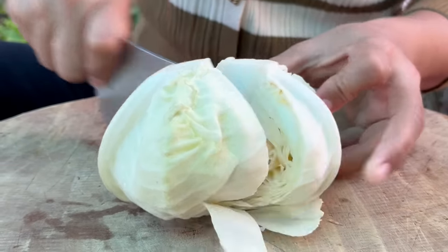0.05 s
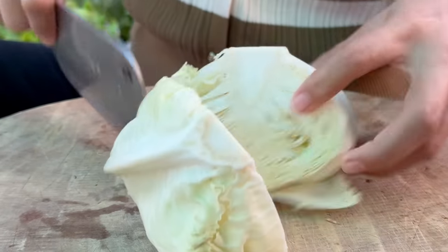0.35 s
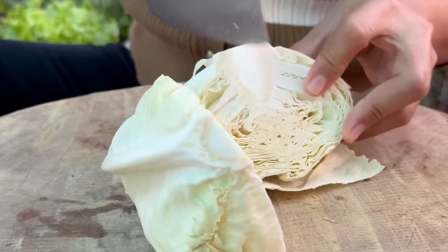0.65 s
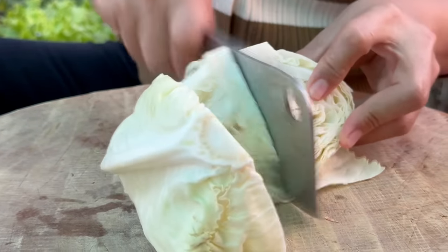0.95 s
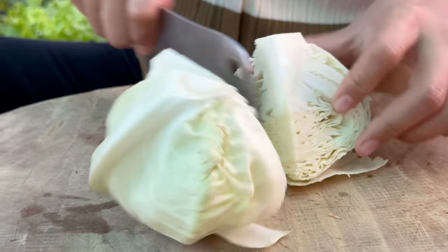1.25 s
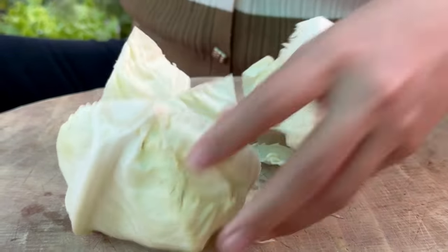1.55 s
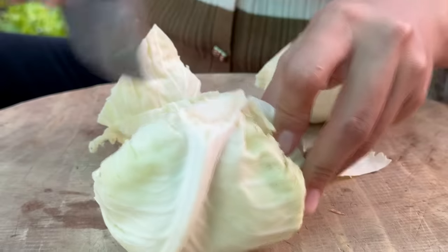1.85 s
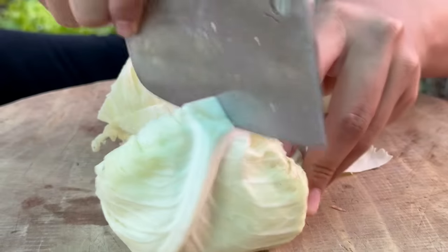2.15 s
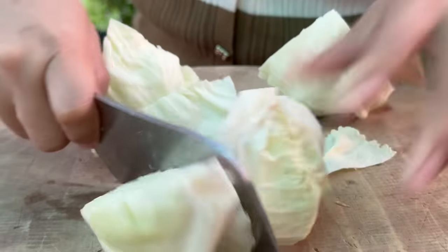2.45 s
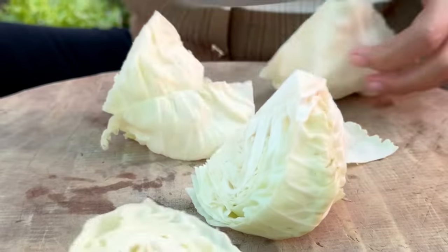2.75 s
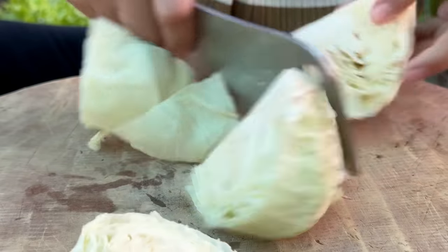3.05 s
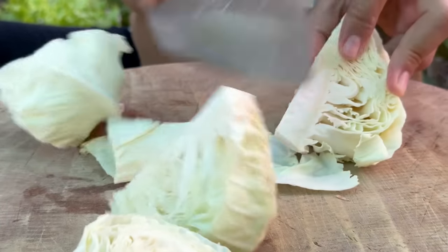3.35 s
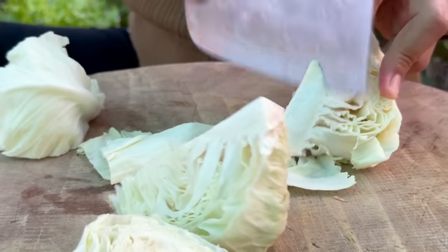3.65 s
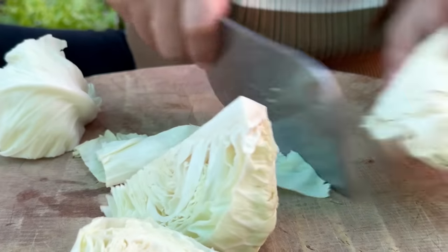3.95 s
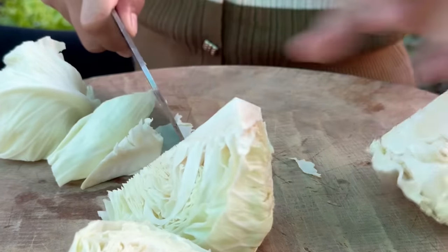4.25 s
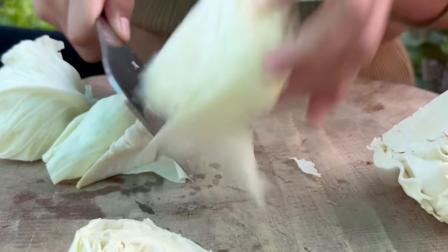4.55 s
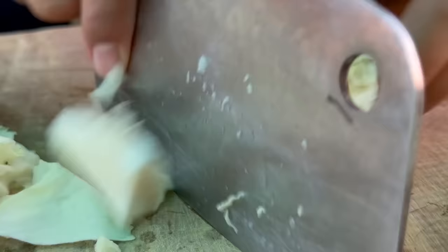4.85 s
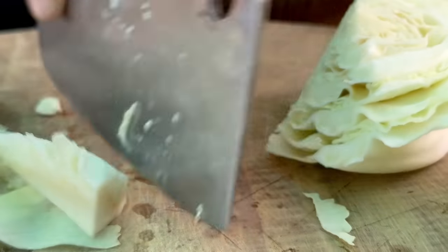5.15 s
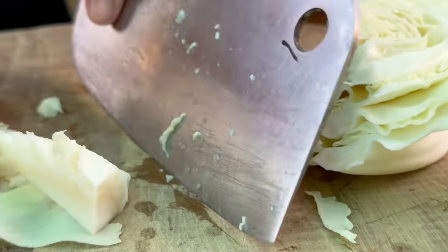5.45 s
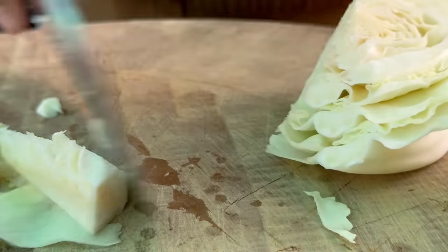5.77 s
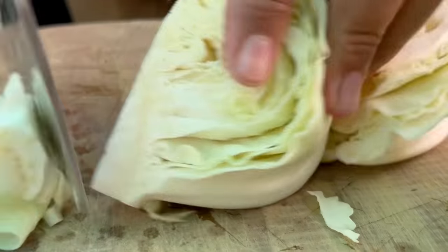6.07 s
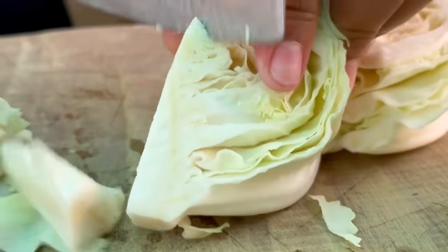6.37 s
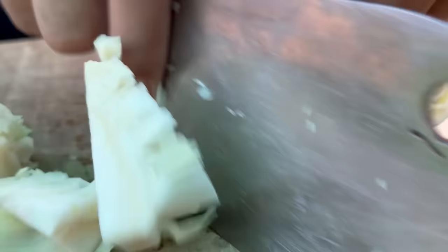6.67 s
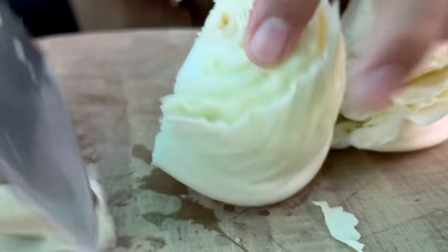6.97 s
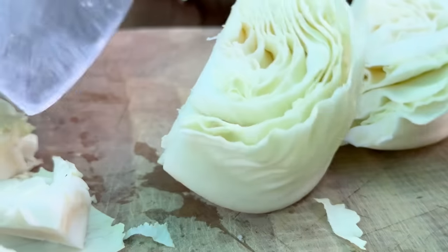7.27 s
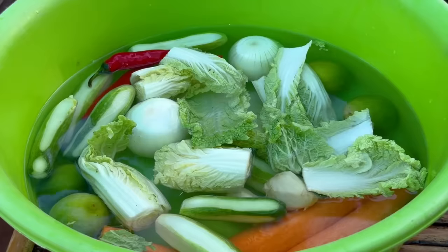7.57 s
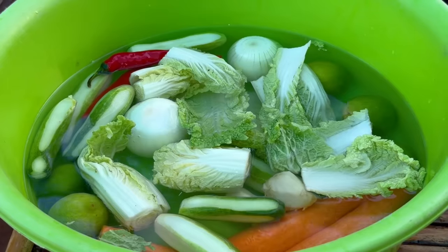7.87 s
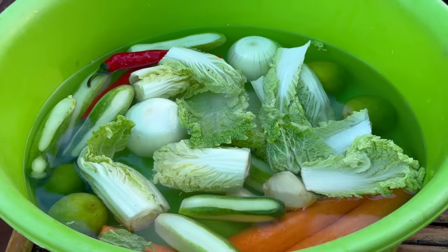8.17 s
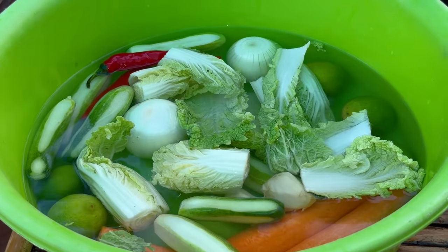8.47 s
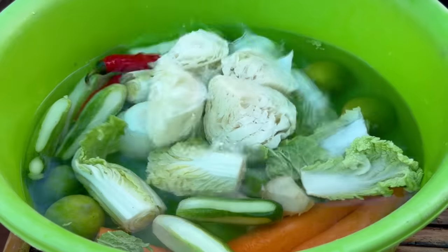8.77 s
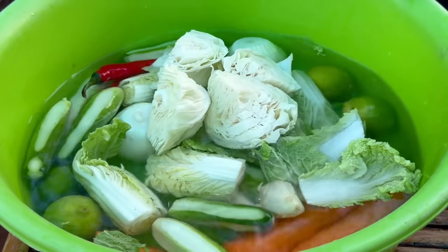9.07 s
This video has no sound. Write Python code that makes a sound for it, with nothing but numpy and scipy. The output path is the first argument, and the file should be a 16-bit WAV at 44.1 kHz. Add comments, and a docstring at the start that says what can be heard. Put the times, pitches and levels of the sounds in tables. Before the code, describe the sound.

A cleaver cuts cabbage on a thick wooden board, heard close up outdoors. After a hollow knock at 0.5 seconds, a crisp crunch swells and ends in a chop near 1 second. More crunching cuts thud into the wood at about 2.2, 3.8, 4.8 and 6.6 seconds. Between them, wedges and blade land with irregular hollow knocks, strongest around 2.6, 3.3, 4.1, 5.6 and 7.1 seconds, while ribs snap and wet leaves rustle. The steel pings briefly near 1.9 and 7.1 seconds, scrapes around 4, 5, 5.8 and 6.8, and sometimes whistles faintly. Fingers squeak softly on leaves around 5.5 and 6.2 seconds. From 7.5 seconds a low hum comes in, with a few small drips at a basin and pieces knocking down at 8.3, 8.7 and 9.1. Thin air and faint rumble continue throughout, with a distant engine fading after about 4 seconds.

```python
"""Crisp crunches and hollow wooden knocks, close up: a cleaver cuts a cabbage on a thick board outdoors.
Leaf cells burst under the edge, which then thuds into the wood. Wedges are turned and knocked down,
wet leaves rub and squeak, and the steel scrapes, pings and whistles. At the end a few pieces are set
down by a dripping basin with a low hum. A far engine, thin air and a faint rumble lie under it all."""
import sys
import numpy as np
from scipy import signal
from scipy.fft import rfft, irfft, next_fast_len
from scipy.io import wavfile
from scipy.ndimage import uniform_filter1d

SR = 44100
rng = np.random.default_rng(int(sys.argv[2]) if len(sys.argv) > 2 else 0)


def generate_wav(signal):
    """Clip the signal to [-1, 1] and save it as 16-bit WAV at the path in sys.argv[1]."""
    frames = np.transpose(np.atleast_2d(signal))
    scaled = np.clip(frames, -1, 1) * 32767
    pcm = np.round(scaled).astype(np.int16)
    wavfile.write(sys.argv[1], SR, pcm)


N = 406157
TIME = np.arange(N) / SR
HIT = TIME[:SR // 3]  # time axis of one short sound
BLOW = HIT[:SR // 6]  # shorter, for sounds that die quickly
TOP_HZ = 15900

# wedges and knife landing on the board and crushing leaves:
# t/s, level/dB, contact/s, place on the board/0-1, left minus right/dB, crunch/dB, crunch decay/s
KNOCKS = [(0.201, -36.5, 0.00012, 0.23, -2, -29.5, 0.0023), (0.321, -38.5, 0.0045, 0.88, -1, -72, 0.0023),
          (0.546, -16.5, 0.00072, 0.8, -1, -31.5, 0.0032), (1.246, -31, 0.0022, 0.76, -0.5, -27, 0.0017),
          (1.578, -29.5, 0.00024, 0.23, -2, -29, 0.003), (1.696, -43, 0.0023, 0.1, -6, -32, 0.00052),
          (1.9242, -22, 0.00016, 0.76, 1, -38.5, 0.0012), (1.94, -33.5, 0.001, 0.88, -4, -70, 0.0016),
          (2.296, -35.5, 0.0018, 0.13, 1, -66, 0.0039), (2.605, -19, 0.00068, 0.87, -4, -32, 0.004),
          (2.958, -24.5, 0.00048, 0.24, -1, -28.5, 0.0026), (3.039, -44.5, 0.0057, 0.92, -2, -69, 0.002),
          (3.325, -17.5, 0.00062, 0.85, -2.5, -33.5, 0.0038), (3.383, -30.5, 0.0028, 0.92, 1, -76, 0.002),
          (3.722, -25.5, 0.0018, 0.9, -0.5, -32.5, 0.0017), (4.082, -17.5, 0.00047, 0.75, -1, -35, 0.0005),
          (4.437, -23, 0.0015, 1, -2.5, -39, 0.0063), (4.521, -39.5, 0.00066, 0.35, 3, -27, 0.0025),
          (4.872, -29, 0.00089, 0.17, -0.5, -32, 0.00084), (5.23, -34.5, 0.0022, 0.85, -7, -34, 0.009),
          (5.615, -19, 0.00059, 0.43, -3, -41, 0.0011), (6.371, -39, 0.0033, 0.2, -3, -33.5, 0.0042),
          (6.744, -35, 0.0024, 0.47, -7, -29, 0.0007), (7.140, -16, 0.00044, 0.81, -2.5, -33.5, 0.00094),
          (7.727, -45, 0.0027, 0.64, 0, -61, 0.0019), (7.956, -36.5, 0.00022, 0.28, -0.5, -38.5, 0.012),
          (8.1, -52.5, 0.0035, 0.74, 0, -81, 0.0018), (8.322, -22.5, 0.00069, 0.76, -2, -36.5, 0.0096),
          (8.442, -45, 0.0036, 0.6, -2, -74, 0.002), (8.683, -22, 0.0005, 0.47, -0.5, -41, 0.03),
          (9.057, -30.5, 0.0018, 0.53, -1, -45, 0.012)]
# edges of the wood's six registers: f/Hz
REGISTER_EDGES = [180, 380, 560, 800, 1100, 1500, 3000]
# bright sizzle of bursting leaf cells: f/Hz, level/dB
LEAF_CRISP = [(800, -48.5), (2500, -18), (3800, 0), (7500, 6), (11000, -0.5), (14500, -2), (16000, -6.5)]
# tone of a dragging leaf: f/Hz, level/dB
LEAF_RUB = [(100, -5.5), (350, 6), (1000, -4.5), (2200, -4), (4000, -8.5), (7500, -5), (11000, -12),
            (15000, -41.5)]


def undb(db):
    """Decibels to gain."""
    return 10 ** (np.asarray(db) / 20)


def unit(x):
    """Scale to rms 1."""
    return x / np.sqrt(np.mean(x ** 2))


def hit_level(x, db):
    """Give a short sound the energy of 30 ms at this level."""
    return x * undb(db) * np.sqrt(int(.03 * SR) / np.mean(np.sum(x ** 2, axis=-1)))


def fader(points):
    """Gain over the whole scene through (t/s, level/dB) points."""
    return undb(np.interp(TIME, *np.transpose(points)))


def swell(half_s, db):
    """Gain of one smooth stroke of the hand, strongest in the middle."""
    return undb(db) * np.exp(-((HIT - HIT.mean()) / half_s) ** 2)


def add(out, s, x):
    """Mix a sound in at time s."""
    i = max(int(s * SR), 0)
    out[:, i:i + x.shape[-1]] += x[..., :N - i]


def colour(x, points, size=4096):
    """Minimum-phase EQ through (f/Hz, level/dB) points: nothing rings ahead of an attack."""
    hz, db = np.transpose(points)
    curve_db = np.interp(np.log(np.fft.rfftfreq(size, 1 / SR) + 1), np.log(hz), db)
    cepstrum = irfft(np.log(undb(curve_db)))
    cepstrum[1:size // 2] *= 2
    cepstrum[size // 2 + 1:] = 0
    impulse = irfft(np.exp(rfft(cepstrum)))
    return signal.fftconvolve(x, impulse[None], axes=-1)[:, :x.shape[-1]]


def bandpass(x, lo_hz, hi_hz, order=2):
    """Keep the band between two edges."""
    return signal.sosfilt(signal.butter(order, [lo_hz, hi_hz], "band", fs=SR, output="sos"), x)


def stereo(mid, side, width):
    """Left and right from mid and side."""
    return mid + width * side * np.array([[1], [-1]])


def noise(count, width):
    """Stereo white noise."""
    return stereo(*rng.standard_normal((2, count)), width)


def crackle(count, rate, spread_db, width):
    """Tiny bursts or slips: random clicks of uneven size, each panned on its own, over a faint hiss."""
    size = undb(spread_db * np.minimum(rng.exponential(size=count), 4)) * rng.standard_normal(count)
    clicks = size * (rng.random(count) < rate / SR) + 0.031 * rng.standard_normal(count)
    return stereo(clicks, clicks * rng.standard_normal(count), width)


def drift(rate, count):
    """Independent random curves, one short sound long, turning rate times a second."""
    steps = rng.standard_normal((100, count)).T
    return np.array([np.interp(HIT * rate, np.arange(len(row)), row) for row in steps])


def wavering(phase, depth):
    """A tone whose strength and phase drift a few times a second."""
    turns_s = np.linspace(0, TIME[-1], num=60)
    offsets = rng.standard_normal(len(turns_s)) + 1j * rng.standard_normal(len(turns_s))
    gain = 1 + depth * np.interp(TIME, turns_s, offsets)
    return np.real(gain * np.exp(1j * (phase + 2 * np.pi * rng.random())))


def outdoor_bed():
    """A faint, narrow rumble under thin, wider air noise."""
    # tone of each layer: f/Hz, level/dB
    rumble_eq = [(20, -34), (35, -17.5), (52, -5), (75, -2.5), (100, -2), (120, -2), (145, -7), (180, -10),
                 (260, -22), (500, -41.5)]
    air_eq = [(30, -8), (100, -6), (200, 0.5), (300, -2.5), (500, -7.5), (1000, -12), (2500, -17.5),
              (7500, -31.5), (11000, -47), (15000, -40.5)]
    # their slow rise and fall: t/s, level/dB
    rumble_ride = [(0, -49), (2.1, -49), (3.3, -48), (4.5, -50), (5.1, -52), (7.3, -51), (9.2, -48)]
    air_ride = [(0, -54), (1.8, -57), (2.01, -54), (2.1, -49), (2.4, -56), (4.3, -56.5), (6.9, -59),
                (7.35, -59), (7.7, -58)]
    rumble = unit(colour(noise(N, width=0.11), rumble_eq)) * fader(rumble_ride)
    air = unit(colour(noise(N, width=0.432), air_eq)) * fader(air_ride)
    return rumble + air


def engine(waver=0.54):
    """A far engine slows, then picks up as it fades; its lines waver on the way through the air."""
    # the engine's run: t/s, cycle rate/Hz, level/dB
    run = [(0, 20.7, -49), (2.4, 18.4, -43), (3.199, 17.7, -46), (4.4, 17.7, -51), (5.301, 18, -59.5),
           (7, 21, -67.5)]
    # its strongest lines: multiple of the cycle rate, level/dB
    orders = [(5, -5.5), (6, -4), (7, -3), (8, -11)]
    s, rate_hz, db = np.transpose(run)
    phase = 2 * np.pi * np.cumsum(np.interp(TIME, s, rate_hz)) / SR
    lines = sum(undb(line_db) * wavering(order * phase, waver) for order, line_db in orders)
    return unit(lines) * undb(np.interp(TIME, s, db))


def rubs(handling_db=-4, band_ratio=3.0):
    """Leaves drag in tiny slips, duller when wet; the fingers keep shifting on them."""
    # finger rustle: t/s, level before the handling_db trim/dB
    handling_ride = [(0.0, -45), (0.49, -60), (1.15, -54.5), (1.33, -65.5), (2.02, -64), (2.23, -43.5),
                     (2.77, -69.5), (4.0, -51), (4.3, -77), (4.69, -54), (5.51, -73), (5.84, -54),
                     (6.25, -58.5), (6.71, -66), (6.94, -63.5), (9.2, -60.5)]
    # leaves dragged on board or hand: middle/s, half length/s, level/dB, centre/Hz
    drags = [(1.171, 0.059, -51, 2500), (2.115, 0.011, -45.5, 3460), (3.088, 0.066, -52.5, 4930),
             (3.678, 0.051, -45, 6040), (4.558, 0.089, -54.5, 6600), (5.468, 0.02, -52, 4460),
             (5.938, 0.023, -49, 5380), (5.998, 0.013, -31, 4980), (6.347, 0.023, -52.5, 5290),
             (7.561, 0.075, -46.5, 5550), (8.765, 0.069, -51, 6000), (8.953, 0.01, -44, 5410),
             (9.045, 0.0056, -37, 5440)]
    rustle = unit(colour(crackle(N, rate=800, spread_db=3.0, width=0.24), LEAF_RUB))
    out = rustle * fader(handling_ride) * undb(handling_db)
    for s, half_s, db, hz in drags:
        slips = colour(crackle(len(HIT), rate=2800, spread_db=0.5, width=0.1346), LEAF_RUB)
        rub = bandpass(slips, hz / band_ratio, min(hz * band_ratio, TOP_HZ))
        add(out, s - HIT.mean(), swell(half_s, db) * unit(rub))
    return out


def scrapes(hiss_db=-11.0, grip_db=2.0, grip_rate=40, flex_hz=28):
    """Friction sets the blade's plate modes singing; each swells and bends as the contact travels."""
    # modes of the free blade: f/Hz, bandwidth/Hz, level/dB
    blade = [(258, 63, 10), (880, 223, -1), (2084, 50, 7.5), (3430, 165, -0.5), (3740, 80, 1),
             (4980, 170, -3), (5220, 71, 6), (6700, 78, 3), (7340, 210, -5), (7940, 180, -1.5),
             (8570, 720, -4), (10200, 62, 1), (10900, 50, -1), (13800, 710, -8)]
    # its flat sliding on leaves or wood: middle/s, half length/s, level/dB
    slides = [(0.085, 0.17, -74), (0.823, 0.033, -46), (1.334, 0.033, -51.5), (4.01, 0.035, -41.5),
              (4.122, 0.032, -46), (5.017, 0.028, -35), (5.786, 0.057, -38.5), (6.787, 0.016, -41.5),
              (6.848, 0.054, -34)]
    out = np.zeros((2, N))
    hz, bandwidth, db = np.transpose(blade)[:, :, None]
    decay = np.exp(-np.minimum(np.pi * bandwidth * BLOW, 50))
    modes = undb(db) * bandwidth * decay * np.exp(2j * np.pi * hz * BLOW)
    modes = modes / np.linalg.norm(modes.imag)
    for s, half_s, level_db in slides:
        slips = unit(crackle(len(HIT), rate=7200, spread_db=2.0, width=0.23))
        grip = unit(undb(grip_db * drift(grip_rate, count=len(blade))))
        flex = np.exp(2j * np.pi * flex_hz * np.cumsum(drift(grip_rate, count=len(blade)), axis=1) / SR)
        drive = swell(half_s, level_db) * slips
        rings = signal.fftconvolve(drive[:, None], modes[None], axes=-1)[..., :len(HIT)]
        steel = np.imag(rings * grip * flex).sum(axis=1)
        hiss = swell(half_s, level_db + hiss_db) * unit(colour(slips, LEAF_RUB))
        add(out, s - HIT.mean(), steel + hiss)
    return out


def leaf_breaks(rib_body_db=-4, crush_body_db=-5.5, crush_lead_s=0.0017):
    """Ribs snap alone, or leaves give way just ahead of a knock: t/s, decay/s, body/dB, crisp/dB."""
    # single ribs snapping under blade or fingers: t/s, decay/s, level/dB
    ribs = [(0.031, 0.00039, -39.5), (0.673, 0.00076, -56), (0.823, 0.0013, -40), (0.904, 0.0035, -34),
            (0.9407, 0.00086, -43), (0.951, 0.0034, -38.5), (0.988, 0.0021, -42.5), (1.115, 0.0021, -45),
            (1.622, 0.002, -49.5), (2.216, 0.003, -31), (2.2751, 0.003, -33), (2.3065, 0.0011, -46),
            (2.821, 0.0033, -51), (3.3372, 0.0017, -38), (3.703, 0.0043, -36), (3.7471, 0.00028, -29.5),
            (4.06, 0.0041, -36), (4.0809, 0.00095, -27.5), (4.201, 0.00087, -55.5), (4.364, 0.0069, -53),
            (4.4174, 0.0084, -42), (5.6191, 0.0022, -31), (5.9879, 0.0083, -40), (6.343, 0.001, -49),
            (6.477, 0.001, -43.5), (6.516, 0.003, -35), (6.5416, 0.0012, -29.5), (6.549, 0.0025, -31),
            (6.5686, 0.0012, -25.5), (6.5725, 0.0018, -24), (7.146, 0.00034, -40), (7.49, 0.0054, -41.5),
            (8.728, 0.00019, -28.5), (8.748, 0.0033, -33), (8.861, 0.002, -51), (9.068, 0.00036, -43)]
    alone = [(s, decay_s, db + rib_body_db, db) for s, decay_s, db in ribs]
    crushed = [(s - crush_lead_s, decay_s, db + crush_body_db, db) for s, *_, db, decay_s in KNOCKS]
    return alone + crushed


def snaps(rise_s=0.00041, lead_db=-16, tail_db=-20, tail_s=0.015, crack_s=0.00045, lead_s=0.0027):
    """A leaf rib gives way: faint ticks as it bends, one sharp crack, a burst of cells, stragglers."""
    # the snap's midrange body and the bright tip of its crack: f/Hz, level/dB
    body_eq = [(200, -3.5), (700, -1), (1600, -4.5), (2800, 2), (4200, -4), (6500, -19), (12000, -24)]
    tip_eq = [(1500, -15), (7000, 7), (15000, -4.5)]
    out = np.zeros((2, N))
    t = HIT[:SR // 10] - HIT[SR // 100]  # zero at the break, 10 ms in
    after = np.maximum(t, 0)
    crack = np.ones((2, 1)) * (t == 0)
    bending = undb(lead_db) * np.exp(-np.abs(t) / lead_s)
    attack = 1 - np.exp(-after / rise_s)
    stragglers = undb(tail_db) * np.exp(-after / tail_s)
    for s, decay_s, body_db, crisp_db in leaf_breaks():
        burst = attack * (np.exp(-after / (2 * decay_s)) + stragglers)
        # the quicker the break, the more of its energy goes into the one crack
        share = 0.5 * crack_s ** 2 / (crack_s ** 2 + decay_s ** 2)
        for cell_eq, crack_eq, db in (body_eq, body_eq, body_db), (LEAF_CRISP, tip_eq, crisp_db):
            cells = (bending + burst) * crackle(len(t), rate=12000, spread_db=4.5, width=0.26)
            add(out, s + t[0], np.sqrt(1 - share) * hit_level(colour(cells, cell_eq), db))
            add(out, s + t[0] + rise_s, np.sqrt(share) * hit_level(colour(crack, crack_eq), db))
    return out


def strike_db(answer_db, db, contact_s, place, node_db=5):
    """Share a blow among the registers: long contact dulls the top, the place picks crests and nodes."""
    edges = np.array(REGISTER_EDGES)
    hz = np.sqrt(edges[:-1] * edges[1:])
    softness_db = 10 * np.log10(1 + (contact_s * hz) ** 4)
    place_db = node_db * np.cos(np.pi * place * (1 + np.arange(len(hz))))
    shape_db = np.array(answer_db) - softness_db + place_db
    return db + shape_db - 10 * np.log10(np.sum(undb(shape_db) ** 2))


def blow(modes, levels_db, hold_s, detune, phase_width, rough, rough_t60):
    """Struck wood: each register's modes ring over a dense clatter; contact feeds them for hold_s."""
    hz, db, t60 = np.transpose(modes)
    pitch = hz * (1 + detune * rng.standard_normal(len(hz)))
    # higher modes differ more in phase between left and right
    skew = rng.standard_normal(len(hz)) * np.minimum(hz / 700, 1)
    phase = stereo(np.pi * np.arange(len(hz)), skew, phase_width)
    free_s = np.hypot(BLOW, hold_s) - hold_s
    decay = undb(db[:, None] - 60 * free_s / t60[:, None])
    rings = np.sin(2 * np.pi * pitch[:, None] * BLOW + phase[:, :, None]) * decay
    out = 0
    for lo, hi, level_db in zip(REGISTER_EDGES, REGISTER_EDGES[1:], levels_db):
        attack = 1 - np.exp(-(BLOW * lo / .5) ** 2)
        ring = rings[:, (hz >= lo) & (hz < hi)].sum(axis=1) * attack
        clatter = bandpass(noise(len(BLOW), width=0.1) * undb(-60 * BLOW / rough_t60), lo, hi, order=3)
        out = out + hit_level(hit_level(ring, 0) + rough * hit_level(clatter, 0), level_db)
    return out


def knocks():
    """Wedges and knife land on the wood with a hollow knock; soft leaves prolong the contact."""
    # modes of the board under a wedge: f/Hz, level/dB, t60/s
    board = [(249.5, 2, 0.043), (335.5, -8, .12), (431.5, 0.5, 0.098), (469, 0.5, 0.078), (536, -3, 0.077),
             (614, 8, 0.047), (731, 2, 0.03), (850, -1, 0.05), (973, 12, 0.068), (1209, 5, 0.055),
             (1379, -0.5, 0.072), (1557, 4.5, 0.025), (1830, 1.5, 0.034), (2520, 4, 0.063)]
    # how readily each register of the free board answers: level/dB
    answer_db = [-6, -4, 1.2, -2, 0, -8]
    out = np.zeros((2, N))
    for s, db, contact_s, place, pan_db, _, _ in KNOCKS:
        levels_db = strike_db(answer_db, db, contact_s, place)
        knock = blow(board, levels_db, hold_s=0.0024, detune=0.012, phase_width=0.75,
                     rough=0.47, rough_t60=0.058)
        add(out, s, knock * undb(stereo(0, pan_db, .5)))
    return out


def pings(attack_s=0.0006):
    """The cleaver rings briefly, damped and slightly retuned by the hand."""
    # modes of the held cleaver: f/Hz, level/dB, t60/s
    cleaver = [(1301, 1.5, 0.053), (2424, 1, 0.019), (2500, -16.5, 0.12), (2600, -3.5, 0.025)]
    # the steel catching a blow: t/s, level/dB, pitch factor of the grip, upper-mode trim/dB
    strikes = [(0.547, -29.5, 1.07, -17), (1.9246, -20, 1, -1), (1.938, -28, 1.11, -20),
               (2.959, -33.5, 1.02, 2), (7.14, -25, 1.14, -14)]
    out = np.zeros((2, N))
    hz, mode_db, t60 = np.transpose(cleaver)[:, :, None]
    for s, db, tuning, upper_db in strikes:
        decay = undb(mode_db + upper_db * (hz > hz[0]) - 60 * HIT / t60)
        ring = (np.sin(2 * np.pi * tuning * hz * HIT) * decay).sum(axis=0)
        add(out, s, hit_level(ring * np.minimum(HIT / attack_s, 1), db))
    return out


def stroke(length_s, rise_db, attack_s=0.0019, release_s=0.0015, bend=1.3):
    """Gain of one cut: the edge bites, the level moves by rise_db as it sinks, the board stops it."""
    to_go = 1 - np.clip(HIT / length_s, 0, 1)
    bite = np.clip(HIT / attack_s, 0, 1)
    release = np.exp(-np.maximum(HIT - length_s, 0) / release_s)
    return bite * undb(-rise_db * to_go ** bend) * release


def slices(leaf_rate=450, leaf_db=1.5):
    """Layer after layer of leaves bursts under the edge, mostly swelling towards the dense heart."""
    # cuts through the head: t/s, length/s, final body/dB, final crisp/dB, rise over the stroke/dB
    cuts = [(0.773, 0.18, -22.5, -26.5, 31.5), (2.155, 0.072, -16, -21, 21.5),
            (3.715, 0.059, -25, -26.5, 22), (4.775, 0.014, -32.5, -25.5, -6), (6.468, 0.12, -25, -22.5, 26)]
    # the meat of the crunch: f/Hz, level/dB
    body_eq = [(100, -9.5), (280, -1.5), (700, 3.5), (1150, 5.5), (1900, 4), (3900, -7), (5500, -16.5),
               (10000, -45)]
    out = np.zeros((2, N))
    for s, length_s, body_db, crisp_db, rise_db in cuts:
        leaf_s = np.cumsum(rng.exponential(1 / leaf_rate, size=400))
        toughness = undb(leaf_db * np.interp(HIT, leaf_s, rng.standard_normal(len(leaf_s))))
        cells = toughness * crackle(len(HIT), rate=14000, spread_db=1.0, width=0.18)
        body = undb(body_db) * unit(colour(cells, body_eq))
        crisp = undb(crisp_db) * unit(colour(cells, LEAF_CRISP))
        add(out, s, stroke(length_s, rise_db) * (body + crisp))
    return out


def whistles(wobble_hz=130, wobble_rate=280, flutter_db=3):
    """A thin whistle, as of wet steel on a leaf: the drag locks onto one unsteady, gliding pitch."""
    # whistling drags: middle/s, half length/s, level/dB, f/Hz, glide/(Hz per s)
    drags = [(0.828, 0.021, -43.5, 3410, 0), (3.545, 0.058, -61, 3650, 1506),
             (6.661, 0.0276, -57.5, 5710, -4000), (7.275, 0.09, -69, 2710, 796)]
    out = np.zeros((2, N))
    for s, half_s, db, hz, glide in drags:
        wobble, flutter = drift(wobble_rate, count=2)
        pitch = hz + glide * (HIT - HIT.mean()) + wobble_hz * wobble
        tone = undb(flutter_db * flutter) * np.sin(2 * np.pi * np.cumsum(pitch) / SR)
        add(out, s - HIT.mean(), swell(half_s, db) * unit(tone))
    return out


def chops(thump_hz=57, thump_t60=0.069):
    """The edge breaks through and stays on the wood: a dead knock, and the whole block bobs."""
    # the edge landing: t/s, level/dB, contact/s, place on the board/0-1, left minus right/dB, thump/dB
    landings = [(0.954, -24.0, 0.00087, 0.75, -1, -48), (2.221, -20, 0.00064, 0, 0, -46),
                (3.769, -16.5, 0.00065, 0.92, 1, -62), (4.787, -14.0, 0.00073, 0.92, 1.5, -36),
                (5.262, -34.0, 0.00067, 0.62, 5, -58), (6.589, -15, 0.0005, 0.93, 1.5, -35.5)]
    # modes of board and cleaver pressed together: f/Hz, level/dB, t60/s
    board_and_blade = [(256.6, 0, 0.0081), (484, 0, 0.013), (573, 0, .02), (884, 0, 0.037),
                       (1229, 3.5, 0.0082), (1400, -10.5, 0.041), (1860, 11.5, 0.025), (2300, 2, 0.047),
                       (2260, -8, 0.043)]
    # how readily each register answers with the edge in the wood: level/dB
    answer_db = [-3, -9.5, -9, 1.5, -6, -0.5]
    out = np.zeros((2, N))
    attack = np.minimum(HIT * thump_hz, 1)
    thump = np.sin(2 * np.pi * thump_hz * HIT) * undb(-60 * HIT / thump_t60) * attack
    for s, db, contact_s, place, pan_db, thump_db in landings:
        levels_db = strike_db(answer_db, db, contact_s, place)
        knock = blow(board_and_blade, levels_db, hold_s=0, detune=.008, phase_width=0.21,
                     rough=0.73, rough_t60=0.014)
        add(out, s, knock * undb(stereo(0, pan_db, .5)))
        add(out, s, hit_level(thump, thump_db))
    return out


def squeaks(slip_rate=900, band_ratio=1.39, skin_db=-9):
    """Wet skin sticks and slips on a leaf, which answers in one broad resonance."""
    # squeaking fingers: middle/s, half length/s, level/dB, f/Hz
    grips = [(5.4, 0.012, -52, 2300), (5.519, 0.0055, -45.5, 2300), (6.105, 0.0095, -52, 2440),
             (6.199, 0.021, -43, 2000)]
    out = np.zeros((2, N))
    for s, half_s, db, hz in grips:
        slips = crackle(len(HIT), rate=slip_rate, spread_db=-2.5, width=0.17)
        leaf = unit(bandpass(slips, hz / band_ratio, hz * band_ratio))
        skin = undb(skin_db) * unit(colour(slips, LEAF_RUB))
        add(out, s - HIT.mean(), swell(half_s, db) * (leaf + skin))
    return out


def hum(hz=92, db=-48, from_s=7.55):
    """By the basin a low, gently wavering hum comes in and stays."""
    fade_in = np.clip((TIME - from_s) * 10, 0, 1)
    return unit(wavering(2 * np.pi * hz * TIME, depth=0.36)) * undb(db) * fade_in


def drips(cycles=4, rise=0.08, attack_s=0.00076):
    """Each drip traps a small bubble, which rings for a few cycles and rises in pitch."""
    # drops by the basin: t/s, level/dB, starting f/Hz
    drops = [(7.76, -58.5, 2300), (7.79, -51, 2000), (8.012, -58, 2330), (8.293, -61.5, 1190),
             (8.753, -42.5, 1450)]
    out = np.zeros((2, N))
    for s, db, hz in drops:
        fade = np.exp(-np.minimum(BLOW * hz / cycles, 20))
        pitch = hz * (1 + rise * (1 - fade))
        bubble = fade * np.sin(2 * np.pi * np.cumsum(pitch) / SR)
        add(out, s, hit_level(bubble * np.minimum(BLOW / attack_s, 1), db))
    return out


def echoes(x, t60, wet_db, build_s=0.0041):
    """Nearby surfaces scatter a short tail, weaker in the treble."""
    tail = noise(len(HIT), width=0.14) * undb(-60 * HIT / t60) * (1 - np.exp(-(HIT / build_s) ** 2))
    tail = tail / np.sqrt(np.sum(tail ** 2) / 2)
    tail = colour(tail, [(100, 8), (450, 2), (1300, -6.5), (2500, -5), (8000, -6.5), (15000, -10.5)])
    return undb(wet_db) * signal.fftconvolve(x, tail, axes=-1)[:, :N]


def scene():
    """Wood, leaves, steel and drips with their echoes, over the outdoor background."""
    impacts = knocks() + pings()
    edge = chops()
    textures = snaps() + slices() + rubs() + squeaks() + scrapes() + whistles() + drips()
    send = impacts + undb(-15.0) * edge + textures  # the chops stay nearly dry
    space = echoes(send, t60=0.29, wet_db=-13.5)
    return impacts + edge + textures + space + outdoor_bed() + hum() + engine()


def record(dry, lag_from_hz=7950, lag_s=1 / 3150):
    """The top octave lags on the left, the sound drops out twice, peaks are rounded, the top is cut."""
    # instants of silence: from/s, to/s
    dropouts = [(4.768, 4.7745), (6.797, 6.815)]
    size = next_fast_len(N)
    above_hz = np.maximum(np.fft.rfftfreq(size, 1 / SR) - lag_from_hz, 0)
    left = irfft(rfft(dry[0], size) * np.exp(-2j * np.pi * above_hz * lag_s), size)[:N]
    gate = np.ones(N)
    for start, end in dropouts:
        gate[(TIME > start) & (TIME < end)] = 0
    rounded = np.tanh(np.array([left, dry[1]]) * uniform_filter1d(gate, size=40))
    return signal.sosfilt(signal.ellip(8, .2, 70, TOP_HZ, fs=SR, output="sos"), rounded)


dry = scene()
out = record(dry)
generate_wav(out)
```